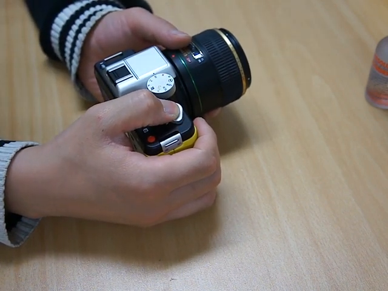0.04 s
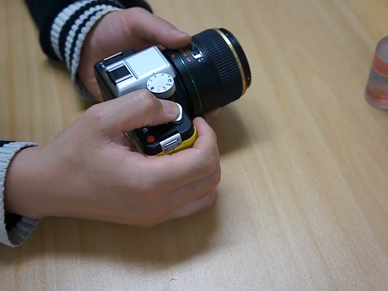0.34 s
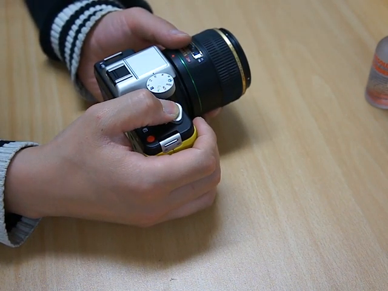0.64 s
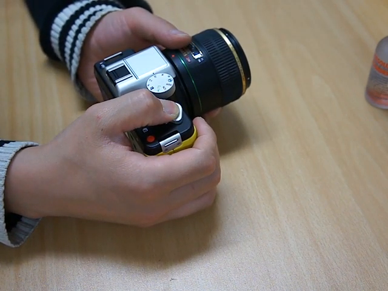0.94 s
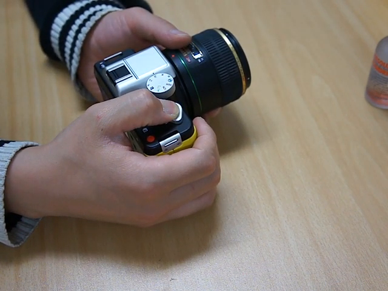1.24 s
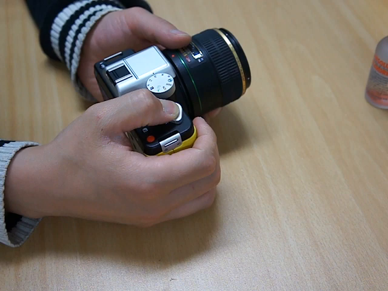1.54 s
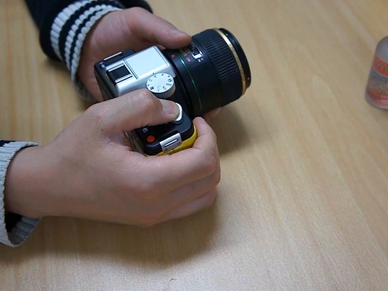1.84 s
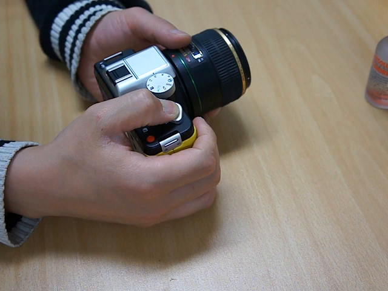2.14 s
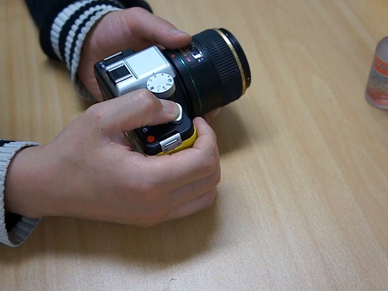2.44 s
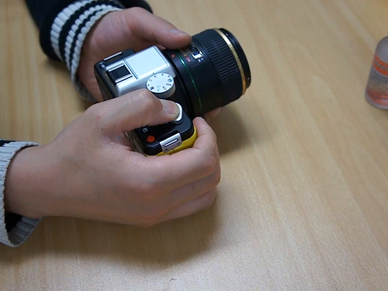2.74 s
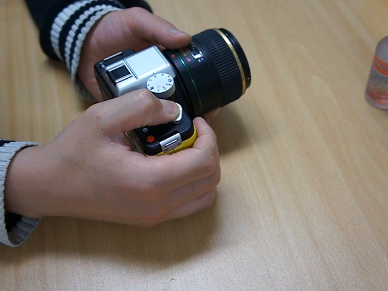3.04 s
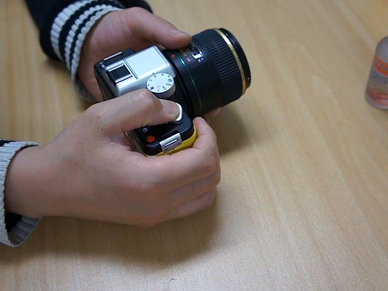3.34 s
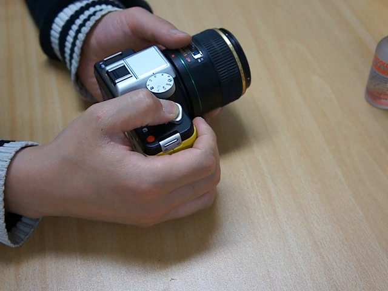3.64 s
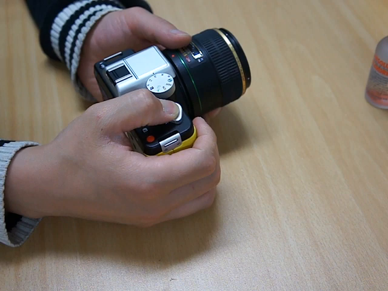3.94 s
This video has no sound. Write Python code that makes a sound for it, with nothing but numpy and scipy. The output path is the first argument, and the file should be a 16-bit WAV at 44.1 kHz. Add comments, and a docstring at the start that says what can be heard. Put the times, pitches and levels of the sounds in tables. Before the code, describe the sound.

A camera shutter clacks in quick succession, then haltingly, close by in a quiet room.

```python
"""A hand-held reflex camera shoots a burst over a wooden table: nine fast frames, then seven halting ones.
It is close to a stereo microphone, a little to the left, in a quiet, rather live room. The button snaps;
then in each frame a latch lets go, the mirror rattles up and two shutter curtains slam 10 ms apart,
with a falling twang of springs. A small geared motor winds the mechanism again after every frame."""
import sys
import numpy as np
from scipy import signal
from scipy.fft import rfft, irfft, next_fast_len
from scipy.io import wavfile
from scipy.ndimage import uniform_filter1d, map_coordinates

SR = 44100
rng = np.random.default_rng(int(sys.argv[2]) if len(sys.argv) > 2 else 0)


def transcribe(u):
    """Save the signal u as a 16-bit wav file named by the first command-line argument.

    u: samples, shape (n,) or (channels, n), limited to [-1, 1]; the rate is SR.
    q: integer samples, one column per channel.
    """
    v = np.clip(np.atleast_2d(u).T, -1, 1)
    q = np.round(v * 32767).astype(np.int16)
    wavfile.write(sys.argv[1], SR, q)


N = 176400
BLOCK = 1024  # samples in one contact, and half the length of a colouring filter

# The first curtain's strike in each frame: t/s, level/dB
FRAMES = [(0.342, -1), (.5121, -1), (0.6823, -1.5), (0.8522, -1), (1.0223, -1), (1.1921, -1),
          (1.3618, -1.5), (1.5324, -1.5), (1.7027, -1), (2.0298, -0.5), (2.2120, -0.5), (2.4827, -1.5),
          (2.6647, -0.5), (2.9349, -1), (3.3132, -1), (3.7011, -1)]


def amp(db):
    return 10 ** (np.asarray(db) / 20)


def unit_rms(x):
    return x / np.sqrt(np.mean(x ** 2) + 1e-20)


def along(points, hz):
    """Read (f/Hz, value) points on a log frequency axis."""
    freqs, values = np.transpose(points)
    return np.interp(np.log(hz + 1), np.log(freqs + 1), values)


def course(points, t):
    """Read (t/ms, value) points at times in seconds."""
    ms, values = np.transpose(points)
    return np.interp(t, ms / 1000, values)


def fade(t, t60):
    return np.exp(-np.log(1000) * t / t60)


def add(out, at_s, x):
    i = int(round(at_s * SR))
    out[..., i:i + x.shape[-1]] += x[..., :max(N - i, 0)]


def filtered(x, response):
    """Scale the spectrum of x by a function of frequency."""
    size = next_fast_len(x.shape[-1] + SR // 4)
    return irfft(rfft(x, size) * response(np.fft.rfftfreq(size, 1 / SR)), size)[..., :x.shape[-1]]


def coloured(x, colour):
    """Pass x through a minimum-phase filter of unit energy, shaped by (f/Hz, level/dB) points."""
    gain = amp(np.maximum(along(colour, np.fft.rfftfreq(2 * BLOCK, 1 / SR)), -70))
    cepstrum = irfft(np.log(unit_rms(gain)))
    cepstrum[1:BLOCK] *= 2
    cepstrum[BLOCK + 1:] = 0
    impulse = irfft(np.exp(rfft(cepstrum)))
    return signal.fftconvolve(x, impulse[None], axes=1)[:, :N]


def spread(pair, side_db):
    """Left and right from two unrelated signals taken as mid and side."""
    side = amp(side_db)
    return np.array([pair[0] + side * pair[1], pair[0] - side * pair[1]]) / np.hypot(1, side)


def widen(pair, width):
    """Left and right from mid and side, with a width that depends on frequency."""
    def response(hz):
        gain = amp(along(width, hz))
        return np.array([np.ones_like(hz), gain]) / np.hypot(1, gain)
    mid, side = filtered(pair, response)
    return np.array([mid + side, mid - side])


def crack(t60=.0137):
    """One contact: a very short burst, even in spectrum, of unit energy."""
    envelope = fade(np.arange(BLOCK) / SR, t60)
    burst = rng.standard_normal((2, BLOCK)) * envelope
    for _ in range(4):  # flatten the spectrum, then restore the decay
        spectrum = rfft(burst, 2 * BLOCK)
        burst = irfft(spectrum / (abs(spectrum) + 1e-9))[:, :BLOCK] * envelope ** .25
    return burst / np.linalg.norm(burst, axis=1, keepdims=True)


def ticks(count, per_s=9000, vary_db=2):
    """Dense tiny impacts of uneven size: count samples at rms 1."""
    shape = (2, count)
    hits = (rng.random(shape) < per_s / SR) * np.sign(rng.standard_normal(shape))
    return unit_rms(hits * amp(vary_db * rng.standard_normal(shape)))


def contacts(pattern, colour, fresh=.35, vary_db=.9, vary_ms=.06):
    """A part strikes its stops in nearly the same way in every frame."""
    out = np.zeros((2, N))
    for ms, db in pattern:
        usual = crack()
        for at_s, frame_db in FRAMES:
            blow = (usual + fresh * crack()) * amp(db + frame_db + vary_db * rng.standard_normal())
            add(out, at_s + (ms + vary_ms * rng.standard_normal()) / 1000, blow)
    return coloured(out, colour)


def room_tone(air_db=-53, hum_db=-66.5, hum_hz=124):
    """Room air all round the microphone, and a faint hum."""
    # Spectrum of the air: f/Hz, level/dB
    colour = [(15, -56), (25, -57), (86, -11.5), (106, -9), (142, -8), (175, -4), (247, -5), (441, -7.5),
              (477, -8), (573, -12), (807, -9), (945, -12), (10700, -25.5), (12500, -31), (13500, -54)]
    air = unit_rms(filtered(rng.standard_normal((2, N)), lambda hz: amp(along(colour, hz))))
    hum = np.sin(2 * np.pi * hum_hz * np.arange(N) / SR)
    return amp(air_db) * spread(air, side_db=0) + amp(hum_db) * hum


def button():
    """The shutter button snaps through its pressure point."""
    # Its two clicks: t/s, level/dB
    snaps = [(.2150, -17.5), (.2218, -23)]
    # Their spectrum: f/Hz, level/dB
    colour = [(120, -47), (500, -9), (1500, -7), (4200, 3), (6000, -12), (11000, -15), (13500, -34)]
    out = np.zeros((2, N))
    for at_s, db in snaps:
        add(out, at_s, amp(db) * crack())
    return coloured(out, colour)


def mirror():
    """The latch lets go and the mirror rattles up, just ahead of the first curtain."""
    # Contacts of latch and mirror: t/ms from the first curtain, level/dB
    strikes = [(-66.5, -19), (-53.5, -14.5), (-48, -9), (-31, -14), (-22, -23.5)]
    # Envelope of the rattle: t/ms from the first curtain, level/dB
    rattle_level = [(-67, -44.5), (-55, -43), (-46.5, -35.5), (-25, -32), (-23, -41), (0, -38)]
    # Spectrum of both: f/Hz, level/dB
    colour = [(60, -49), (250, -18.5), (464, -25.5), (645, -3.5), (900, -13), (1090, -4), (1450, -13.5),
              (2000, -2.5), (3210, -6.5), (5040, -12), (6700, -12.5), (10300, -12), (11800, -16.5),
              (13500, -43)]
    rattle = np.zeros((2, N))
    t = np.arange(rattle_level[0][0] / 1000, 0, 1 / SR)
    for at_s, db in FRAMES:
        add(rattle, at_s + t[0], ticks(SR // 8)[:, :len(t)] * amp(db + course(rattle_level, t)))
    return coloured(rattle, colour) + contacts(strikes, colour)


def first_curtain():
    """The opening curtain slams into its stop."""
    # Its contacts: t/ms into the frame, level/dB
    strikes = [(0.1, -2), (1.6, -8), (6.4, -6)]
    # Their spectrum: f/Hz, level/dB
    colour = [(60, -50), (220, -13.5), (450, -11.5), (700, 4.5), (880, -9), (1100, -7), (1450, 1),
              (1880, 0), (2300, 3.5), (2520, 6.5), (2820, -1), (3150, 2.5), (3420, -5), (5400, -18.5),
              (6500, 2), (7600, -11), (9600, -2.5), (11500, -21), (13500, -21)]
    return contacts(strikes, colour)


def body_knock():
    """The first curtain knocks the hollow body in every frame."""
    # Modes of the body: f/Hz, level/dB, t60/s
    modes = [(1112, -36, .045), (1290, -41, .035), (2510, -35, .022), (3130, -29.5, .028)]
    out, t = np.zeros((2, N)), np.arange(SR // 10) / SR
    ring = sum(amp(db) * fade(t, t60) * np.cos(2 * np.pi * hz * t) for hz, db, t60 in modes)
    for at_s, db in FRAMES:
        add(out, at_s, amp(db) * ring)
    return out


def springs(delay_s=.006, attack_s=.0023, vary_db=1, vary_rad=.45):
    """The curtains leave the springs and plates ringing."""
    # Modes of springs and body plates: f/Hz, level/dB, t60/s
    modes = [(630, -45.5, .25), (715, -47.5, .35), (1122, -48, .16), (1306, -50.5, .18), (1531, -43, .24),
             (1647, -44, .18), (1744, -42, .14), (1865, -44, .1), (2215, -46, .15), (2580, -49, .14),
             (2703, -48, .14), (6790, -51, .18)]
    out, t = np.zeros((2, N)), np.arange(SR // 3) / SR
    for hz, db, t60 in modes:
        ring = np.exp(2j * np.pi * hz * t) * fade(t, t60) * (1 - np.exp(-t / attack_s))
        usual_phase = 2 * np.pi * rng.random((2, 1))
        for at_s, frame_db in FRAMES:
            phase = usual_phase + vary_rad * rng.standard_normal((2, 1))
            gain = amp(db + frame_db + vary_db * rng.standard_normal())
            add(out, at_s + delay_s, gain * (np.exp(1j * phase) * ring).real)
    return spread(out, side_db=-5)


def second_curtain():
    """The closing curtain slams shut and clatters against its stop."""
    # Its contacts: t/ms from the first curtain, level/dB
    strikes = [(9.7, -6.5), (10.45, -0.5), (12.4, -9), (16.5, -7), (20.9, -11), (25.6, -10)]
    # Their spectrum: f/Hz, level/dB
    colour = [(120, -49), (200, -26), (377, -26.5), (620, -5), (900, -10.5), (1130, -2), (1230, -13.5),
              (1520, -1), (1800, 0), (1970, -9.5), (2220, -2.5), (2420, -11), (2700, -3.5), (2930, -16),
              (3180, -8), (3400, -13.5), (5000, -13), (5400, -7.5), (5900, -11), (10700, -14.5),
              (11700, -17.5), (13500, -39)]
    return contacts(strikes, colour)


def twang(level_db=-35.5, t60=.16):
    """The return spring twangs and sags in pitch as it slackens."""
    # Pitch of the spring: t/ms from the first curtain, f/Hz
    pitch = [(13, 1850), (45, 1530)]
    out, t = np.zeros((2, N)), np.arange(SR // 6) / SR
    delay_s = pitch[0][0] / 1000
    cycles = np.cumsum(course(pitch, delay_s + t)) / SR
    for at_s, db in FRAMES:
        tone = np.sin(2 * np.pi * (cycles + rng.random()))
        add(out, at_s + delay_s, amp(level_db + db) * fade(t, t60) * tone)
    return out


def wavering_phase(hz, depth):
    """Phase of a tone whose pitch jitters by the rms fraction depth."""
    jitter = unit_rms(uniform_filter1d(rng.standard_normal((2, len(hz))), size=40))
    return 2 * np.pi * np.cumsum(hz * (1 + depth * jitter), axis=1) / SR


def winder(mesh_db=-51, octave_db=-39, swell_at_s=.0397, swell_width_s=.0144):
    """A click, then the motor spins up with a rising whine while its gears chatter under the load."""
    # The motor switches on: t/s, level/dB
    starts = [(.355, -1.5), (.525, -0.5), (.695, -0.5), (.865, 0), (1.035, -1.5), (1.204, -0.5),
              (1.375, 0.5), (1.545, -0.5), (1.873, -1), (2.055, -1.5), (2.334, -0.5), (2.508, -1.5),
              (2.789, -1), (3.118, -1), (3.483, -1), (3.870, -1.5)]
    # Motor switch, its rebound and two cam steps: t/ms after switch-on, level/dB
    strikes = [(0, -19.5), (8.5, -27), (98, -21.5), (109, -32.5)]
    # Spectrum of these clicks: f/Hz, level/dB
    click_colour = [(120, -37), (500, -21), (2000, -5.5), (4700, 0), (6000, -3.5), (9000, -2), (11500, -7),
                    (13500, -43)]
    # Chatter of the loaded gears: t/ms after switch-on, level/dB
    gear_effort = [(8, -56), (26, -42), (42, -39), (64, -32.5), (76, -35.5), (88, -44.5), (110, -49)]
    # Spectrum of the chatter: f/Hz, level/dB
    gear_colour = [(240, -58), (400, -44), (545, -12), (690, -2.5), (912, -13.5), (1280, -8), (1480, -11),
                   (2130, -2.5), (4700, -7.5), (5580, -14), (6860, -12.5), (9910, -9.5), (12000, -16.5),
                   (13500, -48)]
    # Rate at which the teeth mesh: t/ms after switch-on, f/Hz
    mesh_pitch = [(0, 500), (30, 1100), (45, 2800), (60, 2200), (110, 3900)]
    # Thin whistle of the motor drive: t/ms after switch-on, f/Hz
    whistle_pitch = [(8, 9300), (25, 10000), (60, 14000)]
    # Envelope of the whistle: t/ms after switch-on, level/dB
    whistle_level = [(7, -81), (11, -49), (28, -48), (55, -67), (80, -85)]
    gears, tones, clicks = np.zeros((3, 2, N))
    t = np.arange(SR // 8) / SR
    swell = np.exp(-.5 * ((t - swell_at_s) / swell_width_s) ** 2)
    for at_s, db in starts:
        add(gears, at_s, amp(db + course(gear_effort, t)) * ticks(len(t)))
        for ms, click_db in strikes:
            add(clicks, at_s + ms / 1000, amp(click_db) * crack())
        mesh_phase = wavering_phase(course(mesh_pitch, t), depth=.022)
        whine = (amp(mesh_db) * np.sin(mesh_phase) + amp(octave_db) * np.sin(2 * mesh_phase)) * swell
        whistle_phase = wavering_phase(course(whistle_pitch, t), depth=.007)
        whistle = amp(course(whistle_level, t)) * np.sin(whistle_phase)
        add(tones, at_s, amp(db) * (whine + whistle))
    return coloured(gears, gear_colour) + coloured(clicks, click_colour) + tones


def hollow_tones(flutter_depth=.3, flutter_per_s=55):
    """Three faint, low tones swell and flutter in the room during the last frames."""
    # The tones: t/s, f/Hz, level/dB, rise/s, t60/s
    tones = [(2.965, 246, -43, .04, .4), (3.14, 238, -52, .035, .3), (3.745, 115, -54, .035, .35)]
    out, t = np.zeros((2, N)), np.arange(SR // 2) / SR
    for at_s, hz, db, rise, t60 in tones:
        flutter = 1 + flutter_depth * map_coordinates(rng.standard_normal(BLOCK), [t * flutter_per_s])
        envelope = np.minimum(t / rise, 1) * fade(np.maximum(t - rise, 0), t60)
        add(out, at_s, amp(db) * envelope * flutter * np.sin(2 * np.pi * hz * t))
    return out


def room_impulse(onset_s=.0051, early_db=-6, early_t60=.063):
    """Quick reflections off table and hands, then the room's tail."""
    # Reverberation time: f/Hz, t60/s
    decay = [(250, 0.43), (800, 0.52), (2000, 0.61), (5500, 0.48), (12000, 0.41)]
    hz, t, spectra = signal.stft(rng.standard_normal((2, SR // 2)), SR, nperseg=256)
    tail = signal.istft(spectra * fade(t, along(decay, hz)[:, None]), SR, nperseg=256)[1]
    t = np.arange(tail.shape[1]) / SR
    tail *= 1 - np.exp(-(t / onset_s) ** 2)
    early = rng.standard_normal(tail.shape) * fade(t, early_t60)
    return tail / np.linalg.norm(tail[0]) + amp(early_db) * early / np.linalg.norm(early[0])


def reverberation(x, drift_hz=.6, drift_share=.35):
    """The room's tail is mostly steady; slowly blended tails vary its colour slightly between frames."""
    # Spectrum of the reflections: f/Hz, level/dB
    colour = [(200, 1.5), (600, -2), (1100, 0), (2000, 0), (3500, 1), (7000, -1), (12000, -3.5)]
    # Their stereo width: f/Hz, side minus mid level/dB
    width = [(200, 1.5), (650, -6), (1200, -5), (2200, -2), (4200, 3.5), (8000, 1.5)]
    angle = 2 * np.pi * drift_hz * np.arange(N) / SR
    drift = np.sqrt(drift_share)
    weights = [np.sqrt(1 - drift_share), drift * np.cos(angle), drift * np.sin(angle)]
    wet = sum(signal.fftconvolve(x[:1] * weight, room_impulse(), axes=1)[:, :N] for weight in weights)
    return filtered(widen(wet, width), lambda hz: amp(along(colour, hz)))


def scene():
    """At the microphone: the mechanism direct and through the room, its ringing dry, all a little left."""
    # Stereo width of the direct sound: f/Hz, side minus mid level/dB
    width = [(200, 6), (650, -36), (1200, -9), (2200, -18), (4200, -6.5), (8000, -6), (12000, -5)]
    # Lean to the left: f/Hz, left minus right level/dB
    balance = [(60, 6), (180, 1.5), (520, 3), (1540, 2.5), (4560, 0.5), (13500, 1)]
    mechanism = first_curtain() + second_curtain() + mirror() + winder() + button()
    camera = amp(-2.5) * (widen(mechanism, width) + reverberation(mechanism))
    mix = camera + body_knock() + twang() + springs() + room_tone() + hollow_tones()
    return filtered(mix, lambda hz: amp(np.array([[.5], [-.5]]) * along(balance, hz)))


def record(dry, bass_hz=22, top_hz=12500, cut_hz=14100):
    """The recorder rolls off gently in the deep bass and steeply at the top of its band."""
    def response(hz):
        high_pass = hz / np.hypot(hz, bass_hz)
        low_pass = (hz < cut_hz) / np.sqrt(1 + (hz / top_hz) ** 56)
        return high_pass * low_pass
    return filtered(dry, response)


dry = scene()
out = record(dry)
transcribe(out)
```